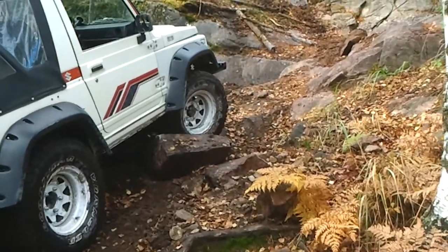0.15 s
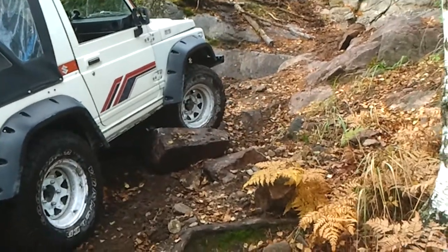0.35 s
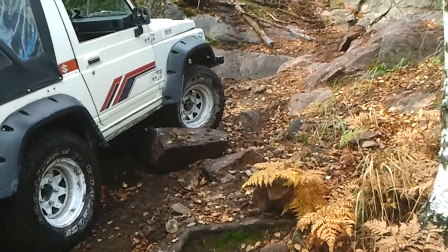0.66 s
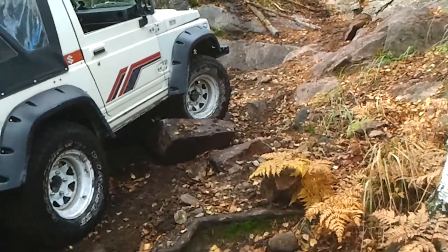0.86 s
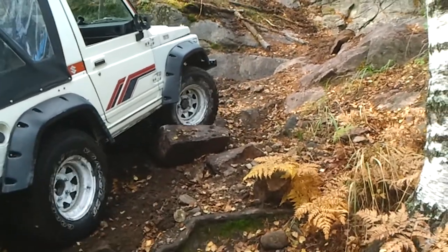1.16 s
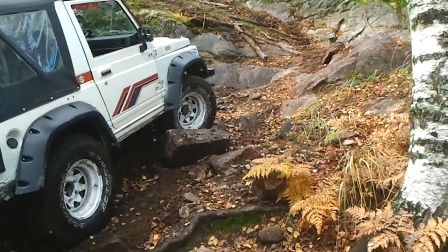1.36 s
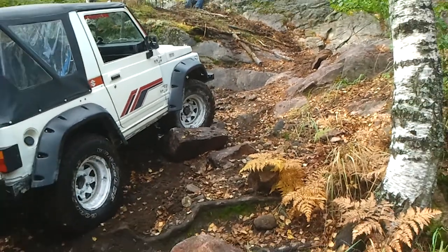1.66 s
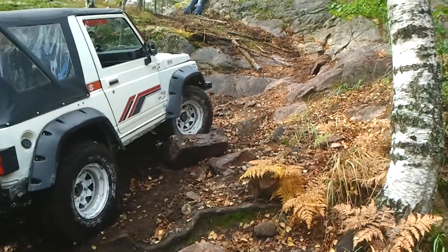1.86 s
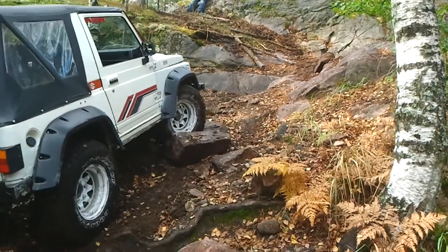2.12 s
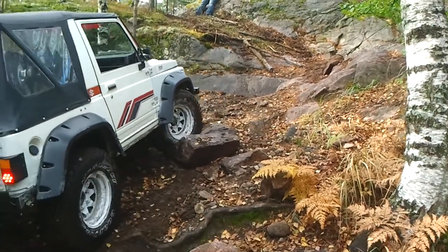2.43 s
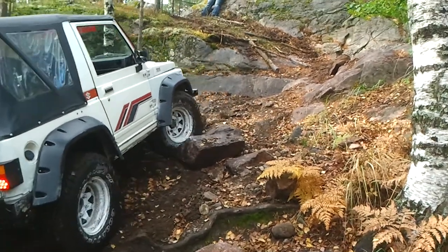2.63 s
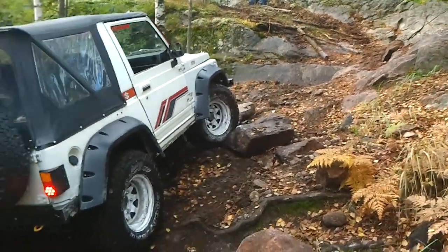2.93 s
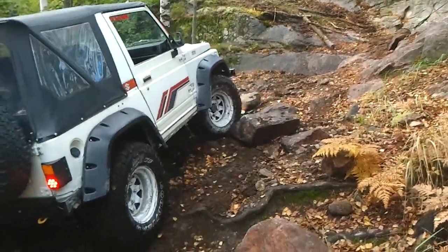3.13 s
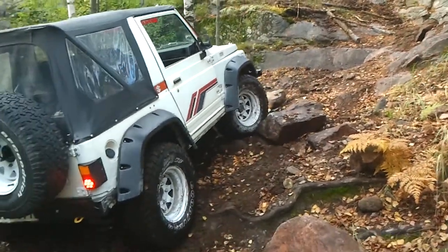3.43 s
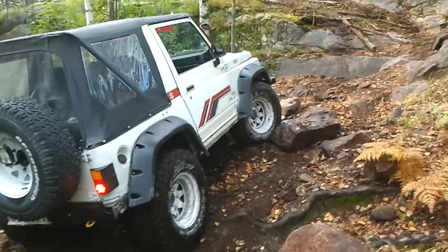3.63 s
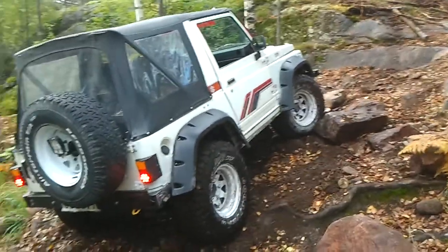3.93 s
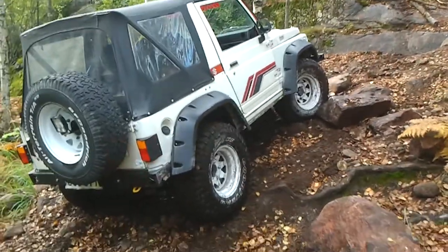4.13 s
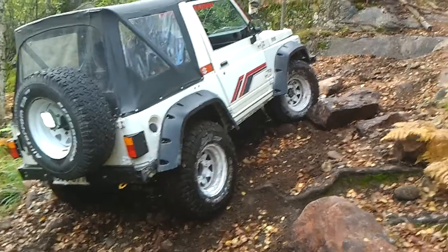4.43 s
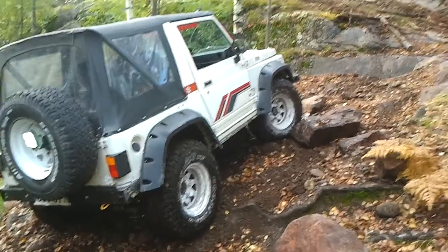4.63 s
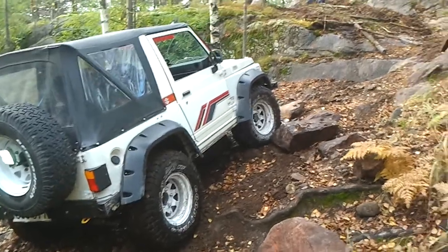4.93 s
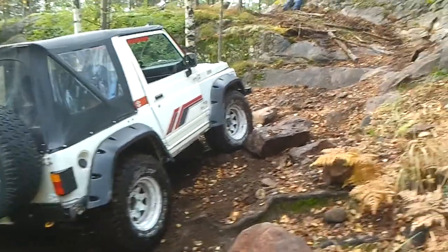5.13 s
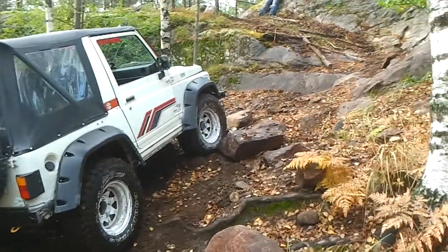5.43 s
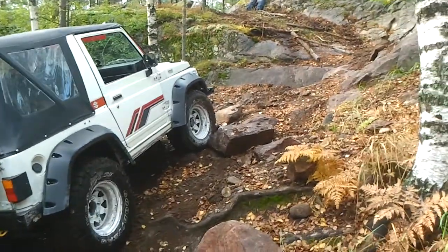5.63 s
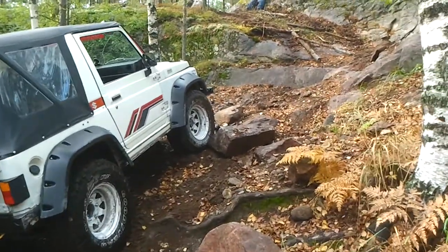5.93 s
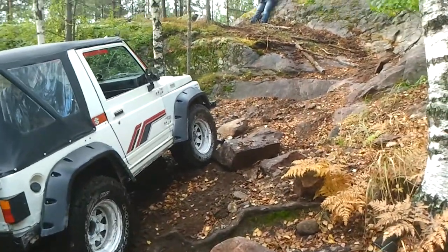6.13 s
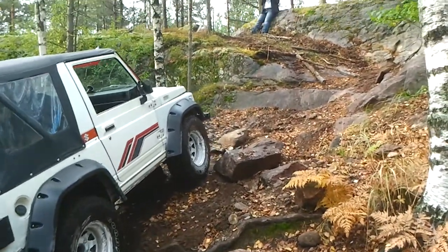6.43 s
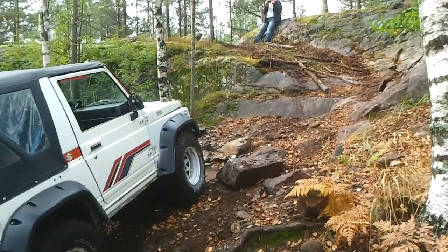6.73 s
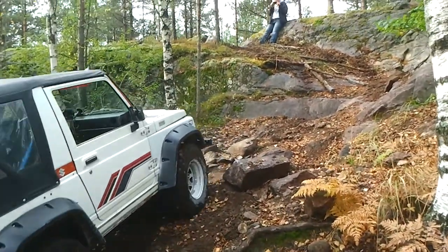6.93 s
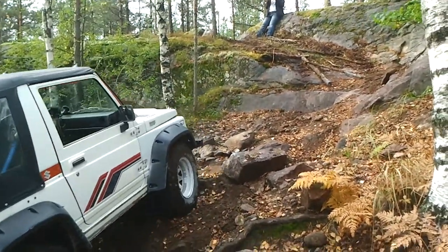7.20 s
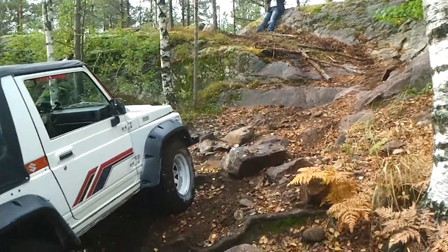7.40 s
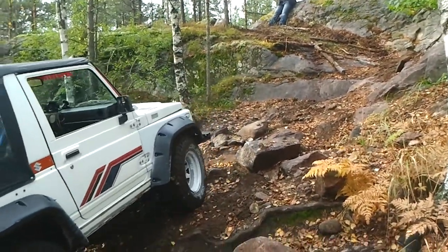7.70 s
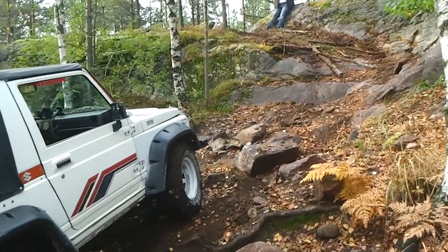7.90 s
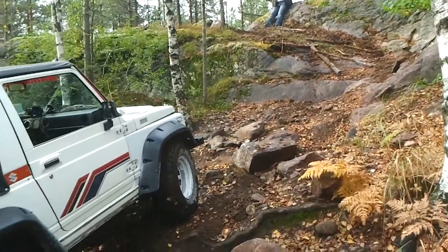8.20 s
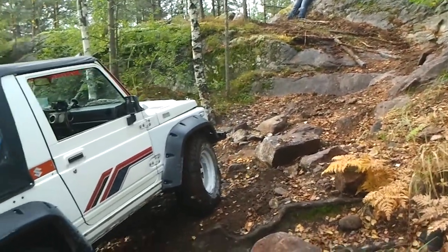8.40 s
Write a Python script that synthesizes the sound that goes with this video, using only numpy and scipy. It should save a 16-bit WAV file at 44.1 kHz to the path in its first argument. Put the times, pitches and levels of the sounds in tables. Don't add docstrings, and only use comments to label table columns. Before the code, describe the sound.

On a rocky woodland slope, a four-cylinder off-road car revs with barking exhaust, valve clatter and fan hiss. After two joined surges it falls to a rough idle, past a bright snap and a short high squeal. A cluster of hard stone knocks follows, then a short rev, a rock clunk and more knocks. A distant engine rises near the end; the microphone is close, with limited treble.

```python
import sys
import numpy as np
from scipy import signal
from scipy.fft import rfft, irfft
from scipy.io import wavfile
from scipy.ndimage import uniform_filter1d

SR = 44100
rng = np.random.default_rng(int(sys.argv[2]) if len(sys.argv) > 2 else 0)


def elevation(decibels):
    levels = np.asarray(decibels, float)
    return 10 ** (levels / 20)


def pcm_store(signal):
    levels = np.round(np.clip(np.atleast_2d(signal), -1, 1) * 32767)
    wavfile.write(sys.argv[1], SR, levels.astype(np.int16).T)


N = 377496


def evened(x):
    return x / np.sqrt(np.mean(x ** 2) + 1e-20)


def steadied(x):
    power = uniform_filter1d(uniform_filter1d(x ** 2, size=4000), size=4000)
    return x / np.sqrt(abs(power) + 1e-20)


def columns(rows):
    s, *values = np.transpose(rows)
    return [np.interp(np.arange(N) / SR, s, v) for v in values]


def add(mix, s, sound):
    part = mix[round(s * SR):][:len(sound)]
    part += sound[:len(part)]


def resonate(x, hz, width):
    turn = np.exp(2j * np.pi * hz * np.arange(len(x)) / SR)
    r = np.exp(-np.pi * abs(width) / SR)
    return 2 * (turn * signal.lfilter([1 - r], [1, -r], x / turn)).real


def body(x, modes):
    return sum((-1) ** k * elevation(db) * resonate(x, hz, width) for k, (hz, width, db) in enumerate(modes))


def noise(points, patchy_db):
    frames = N // 128 + 5
    a, b, patches = rng.standard_normal((frames, 257, 3)).T
    patches = uniform_filter1d(patches, size=6, axis=0)
    patches = evened(uniform_filter1d(patches, size=12, axis=1))
    spectra = (a + 1j * b) * elevation(patchy_db * patches)
    white = signal.istft(spectra, nperseg=512, noverlap=384)[1][:N]
    f, db = np.transpose(points)
    hz = np.fft.rfftfreq(N, 1 / SR)
    colour = elevation(np.interp(np.log(hz + 1), np.log(f + 1), db, left=-90, right=-90))
    return evened(irfft(rfft(white) * colour, N))


def spectrum_db(points, hz):
    f, db = np.transpose(points)
    return np.interp(np.log(hz), np.log(f), db)


def drift(per_s):
    t = np.arange(0, N + 200, 200) / SR
    f, phase = np.geomspace(per_s / 10, per_s, num=24), rng.random(24)
    swings = np.sin(2 * np.pi * (f * t[:, None] + phase)) / np.sqrt(f)
    return np.interp(np.arange(N) / SR, t, evened(swings.sum(axis=1)))


def forest_rumble():
    # frequency in Hz, level in dB per Hz.
    rumble_colour = [(21, -47), (35, -7), (185, -24.5), (232, 4), (294, -6.5), (391, -12.5), (508, -24),
                     (600, -20), (780, -35.5), (1320, -120)]
    return elevation(-46.5) * noise(rumble_colour, patchy_db=0.5)


def far_engine():
    # time in seconds, firings per second, first order in dB, second order in dB.
    far_rev = [(7.38, 51.9, -53, -57), (7.402, 55.0, -52, -48), (7.486, 59.0, -47, -38),
               (7.698, 92.0, -46, -49), (7.806, 100.2, -40, -49), (7.954, 104.5, -42, -44),
               (8.21, 102.8, -53, -50), (8.45, 59.6, -53, -57)]
    hz, first_db, second_db = columns(far_rev)
    t, phase = np.arange(N) / SR, 2 * np.pi * np.cumsum(hz) / SR
    on = np.clip(np.minimum(t - far_rev[0][0], far_rev[-1][0] - t) / .05, 0, 1)
    return np.sqrt(2) * on * (elevation(first_db) * np.sin(phase) + elevation(second_db) * np.sin(2 * phase))


def slope(x):
    at = np.arange(200, 8000, 20)
    taps = np.zeros(8020)
    late = rng.integers(0, 20, len(at))
    taps[at + late] = rng.choice([-1., 1.], len(at)) * elevation(-60 * at / SR / 0.15)
    return signal.oaconvolve(x, taps / np.linalg.norm(taps))[:N]


def crack(peak_db):
    t = np.arange(-20, 60) / SR
    click = -t / .00005 * np.exp(-(t / .00007) ** 2)
    rebounds = np.r_[1, np.zeros(13), -.6, np.zeros(17), .35]
    return elevation(peak_db) * np.convolve(click, rebounds)


def scrape(length, db, hz, width):
    # frequency in Hz, width in Hz, level in dB.
    chassis = [(900, 280, -11), (1685, 120, -6), (2160, 54, -6), (2560, 190, -7), (3650, 590, -26),
               (5290, 69, -8), (5660, 1100, -9)]
    n = int(length * SR)
    slips = rng.standard_normal(6000) * (rng.random(6000) < 6000 / SR)
    shaped = resonate(body(slips, chassis) + .06 * slips, hz, width)
    return elevation(db) * evened(shaped[:n]) * signal.windows.tukey(n, .3) * np.linspace(1.2, .7, n)


def squeak(length, db, start_hz, end_hz):
    n = int(length * SR)
    flutter = 1 + .16 * evened(uniform_filter1d(rng.standard_normal(6000), size=70))[:n]
    tone = np.sin(2 * np.pi * np.cumsum(np.linspace(start_hz, end_hz, n)) / SR)
    swell = signal.windows.tukey(n, .3) if db < -18 else np.hanning(n) ** 2
    return elevation(db) * np.sqrt(2) * flutter * tone * swell


def knock(peak_db, hz, thump_db, snap_db):
    t = np.arange(2000) / SR
    a, b = rng.standard_normal((2, 2000))
    contact_s = .0022 - .00004 * (snap_db + 48)
    push = t / contact_s * np.exp(1 - t / contact_s)
    rattle = evened(resonate(resonate(a, 1300, 2700), 1200, 2700))
    ring = 1.26 * np.sin(2 * np.pi * hz * t) + 0.73 * rattle
    snap = evened(resonate(resonate(b, 4600, 3700), 4600, 3700))
    thump = np.sin(2 * np.pi * 285 * t) * t / 0.0036 * np.exp(1 - t / 0.0015)
    return elevation(peak_db - 4.5) * ring * push + elevation(snap_db) * snap * push ** 2 + elevation(thump_db + 17.5) * thump


def clunk(db, grind, low_hz, high_hz):
    t, rub = np.arange(5000) / SR, rng.standard_normal(5000)
    contact = np.minimum(t / .002, 1) * elevation(-60 * np.maximum(t - grind, 0) / .09)
    panels = resonate(rub, low_hz, 460) - resonate(rub, high_hz, 510) + 0.45 * resonate(rub, 354, 150)
    panels = evened(resonate(panels, 1500, 1800))
    treble = evened(resonate(resonate(rub, 4200, 3500), 4200, 3500)) * elevation(-60 * t / .12)
    return elevation(db) * (panels + elevation(-6.5) * treble) * contact


def ground_contacts():
    # start in seconds, peak in dB, ring in Hz, thump in dB, snap in dB.
    stones = [(0.609, -22.5, 730, -22.5, -38), (3.93, -18, 725, -17.5, -35), (4.62, -29, 1229, -53, -34),
              (4.954, -12, 679.5, -21, -27.5), (4.998, -21.5, 828, -32, -32.5), (5.013, -23, 823, -31, -34),
              (5.044, -27, 813, -33.5, -29.5), (5.061, -21.5, 840, -47, -35),
              (5.179, -31.5, 1775, -40, -44), (5.265, -25, 846, -58, -48), (5.668, -33, 1426, -37.5, -40),
              (5.8, -23, 998, -33.5, -49.5), (5.884, -21, 803.6, -35, -31), (5.916, -16, 842, -22.5, -26),
              (5.962, -21, 915, -21.5, -59), (6.804, -18, 1840, -45, -38), (6.919, -17, 1064, -24.5, -29)]
    # start in seconds, level in dB, grinding time in seconds,
    # lower ring in Hz, upper ring in Hz.
    rocks = [
        (2.356, -16.5, 0.019, 1185, 2110),
        (6.578, -16.5, 0.02, 1100, 2190),
        (7.398, -16.5, 0.023, 1620, 1990),
    ]
    # start in seconds, peak in dB.
    twigs = [
        (3.3692, 4),
        (6.8185, -7.5),
    ]
    # start in seconds, length in seconds, level in dB, centre in Hz, width in Hz.
    creaks = [(0.0, .11, -30.5, 2600, 4000), (.19, 0.039, -37, 5540, 1520),
              (3.122, 0.017, -24.5, 3600, 4000), (3.142, 0.04, -23, 2600, 2950),
              (3.172, 0.043, -21.5, 2520, 3000), (3.328, 0.034, -22.5, 2720, 2480),
              (3.52, 0.097, -32.5, 4200, 3500), (4.4, 0.051, -39, 1262, 1190),
              (4.435, 0.025, -43, 3480, 3000), (5.07, .08, -40.5, 5780, 1800),
              (6.93, 0.054, -42, 2900, 4000), (7.11, 0.033, -37, 5450, 2000),
              (7.15, 0.0083, -31.5, 4300, 1190), (6.92, 0.045, -26.5, 220.9, 152),
              (7.05, .07, -31.5, 236, 149), (7.32, 0.084, -39, 5110, 2480),
              (7.68, 0.051, -41.5, 2496, 3040), (7.945, 0.017, -41, 3800, 1210),
              (1.035, 0.046, -23, 1520, 1810), (.715, 0.089, -27, 550, 400), (5.98, .13, -28.5, 550, 600),
              (4.615, .03, -38, 3457, 4015)]
    contacts = np.zeros(N)
    for table, source in ((stones, knock), (rocks, clunk), (twigs, crack), (creaks, scrape)):
        for s, *row in table:
            add(contacts, s, source(*row))
    return signal.sosfilt(signal.butter(N=2, Wn=140, btype="high", fs=SR, output="sos"), contacts)


def brake_squeaks():
    # start in seconds, length in seconds, level in dB, Hz at start, Hz at end.
    squeals = [(3.235, .075, -15, 5410, 5360), (3.272, .035, -16, 5315, 5300),
               (3.297, .035, -28, 5330, 5310), (3.15, .06, -34, 985, 985), (3.212, .035, -32, 982, 982),
               (3.34, .06, -26, 981, 979), (7.842, .07, -29, 3232, 3226), (7.912, .03, -44, 3228, 3228),
               (0.02, .09, -42, 3945, 3945)]
    brakes = np.zeros(N)
    for s, *row in squeals:
        add(brakes, s, squeak(*row))
    return brakes


def jolts():
    # time in seconds, drop of the clean orders in dB, thud in dB.
    snatches = [(1.585, -10, -47), (1.86, -1, -45), (2.31, -3, -43), (0.806, -1.5, -59)]
    jolt_s, thud_hz = 0.027, 63
    t = np.arange(N) / SR
    drop_db, thuds = np.zeros((2, N))
    for s, db, thud_db in snatches:
        drop_db += db * np.exp(-((t - s) / jolt_s) ** 2)
        swell = np.exp(-((t - s - jolt_s) / jolt_s) ** 2)
        thuds += elevation(thud_db) * 2 * swell * np.sin(2 * np.pi * thud_hz * (t - s))
    return drop_db, thuds


def firings(turns, uneven):
    # a cylinder's strength in dB, its lateness as a share of a firing gap.
    cylinders = [(3.5, 0.02), (-3.5, 0.05), (1.5, -0.03), (-2.0, -0.03)]
    count = np.arange(1, int(turns[-1]))
    db, late = np.transpose(cylinders)[:, count % 4]
    chance = rng.standard_normal((2000, 2))[:len(count)]
    rough = np.interp(count, turns, uneven)
    size = elevation(rough * (db + 1.2 * chance[:, 0]))
    moment = count + rough * (late + .012 * chance[:, 1])
    even, real = np.zeros((2, N))
    even[np.interp(count, turns, np.arange(N)).astype(int)] = 1
    real[np.interp(moment, turns, np.arange(N)).astype(int)] = size
    return real, real - even


def low_orders(hz, turns, throttle, fade_db):
    # frequency in Hz, level in dB.
    shut = [(40, -46.5), (62, -25.5), (100, -33), (125, -30), (146, -19.5), (195, -44), (255, -30),
            (380, -38.5)]
    wide_open = [(42, -37), (65, -31.5), (95, -36), (155, -18), (208, -21), (260, -12), (315, -20.5),
                 (390, -23.5)]
    waver_db = 2.5
    low = np.zeros(N)
    for k in range(1, 7):
        db = (1 - throttle) * spectrum_db(shut, k * hz) + throttle * spectrum_db(wide_open, k * hz)
        db = db + fade_db + waver_db * min(k, 4) / 3 * drift(14)
        db = db - 9 * max(k - 4, 0)
        db = db - 59 * np.maximum(np.log2(k * hz / 403), 0)
        low += np.sqrt(2) * elevation(db) * np.cos(2 * np.pi * k * turns + k * k)
    cam = .42 * np.clip(5 * (1 - throttle), .3, 1) * np.cos(np.pi * turns / 2)
    low = low + cam * resonate(low, 275, 130)
    half_db = 1.26 * fade_db - 22.5 - 6 * throttle + waver_db * drift(12)
    for odd in range(3, 8, 2):
        near = 1 / (1 + ((odd * hz / 2 - 147) / 13.6) ** 4)
        low = low + np.sqrt(2) * elevation(half_db) * near * np.cos(odd * np.pi * turns + odd)
    return low


def exhaust_pipe(upper, lumps, gas, uneven):
    # pipe ring in Hz, width in Hz, level in dB.
    pipe_rings = [(146, 22, 8), (262, 45, 0), (340, 60, -13), (225, 35, -6)]
    high_pass = signal.butter(N=3, Wn=118, btype="high", fs=SR, output="sos")
    pipe = signal.sosfilt(high_pass, body(upper + lumps + .07 * uneven ** 2 * gas, pipe_rings))
    pipe = resonate(pipe, 200, 330)
    pipe = pipe - .7 * resonate(pipe, 192, 45)
    return steadied(pipe)


def silencer_bark(upper, lumps, gas, uneven):
    # silencer ring in Hz, width in Hz, level in dB.
    silencer_rings = [(400, 104, 7), (622, 124, 1.5), (694, 115, 0), (956, 63, -8)]
    push = (1.1 - uneven) * upper + .6 * lumps + (.02 + .13 * uneven) * gas
    return steadied(resonate(body(push, silencer_rings), 700, 700))


def valve_clatter(beat, gas, throb):
    # frequency in Hz, level in dB per Hz.
    clatter_colour = [(440, -19), (750, -8.5), (905, -11.5), (1070, -10), (1680, -7.5), (1990, -12),
                      (2140, -17), (3200, -26), (4160, -37.5), (7040, -120)]
    clatter = beat * noise(clatter_colour, patchy_db=1.6)
    hum = resonate(resonate(gas, 847, 45), 847, 45) / steadied(throb).clip(1)
    return steadied(clatter + 0.3 * evened(hum))


def fan_hiss(beat):
    # frequency in Hz, level in dB per Hz.
    hiss_colour = [(1290, -31), (2200, -11), (2960, -14.5), (3230, -15), (3780, -11), (4510, -13),
                   (6280, -11), (7140, -15.5), (7610, -15), (8120, -18), (8860, -35), (11500, -80.5),
                   (19500, -120)]
    return steadied(beat * noise(hiss_colour, patchy_db=1.5))


def engine():
    # time in seconds, firings per second.
    crank_speed = [(0, 51), (.47, 43), (.78, 71.6), (.97, 84), (1.22, 89.3), (1.4, 95), (1.53, 95.4),
                   (1.73, 93.3), (1.86, 83.5), (2.0, 79.3), (2.27, 89.7), (2.38, 90.5), (2.81, 68),
                   (3.67, 45.9), (4.33, 28.7), (5.82, 26.5), (6.1, 63.5), (6.48, 31.5)]
    # time in seconds, throttle from 0 to 1.
    pedal = [(.44, 0.01), (.74, 0.83), (.82, 0.72), (1.22, 1), (1.33, 0.99), (1.48, 0.72), (1.59, 0.32),
             (1.66, 0.37), (1.86, 0.13), (1.95, 0.8), (2.27, 0.97), (2.31, 0.16), (2.74, 0.14), (3.2, 0.02),
             (5.83, 0), (5.95, .9), (6.06, 0.77), (6.14, 0.02)]
    # time in seconds, tailpipe nearer in dB, bonnet nearer in dB.
    stance = [(0, -6, 1.5), (.3, -4, -2.5), (.75, 0, 2.5), (1.55, -5.5, 2), (2.1, -1.5, 5), (2.45, -7, 2),
              (2.8, -2, 1.5), (3.4, -2, 3.5), (4.15, 2.5, -2.5), (4.7, -5.5, 0.5), (5.82, -7, 0.5),
              (5.92, 6, 1), (6.4, 3, 1), (6.8, -1, 10), (6.97, 8.5, 11.5), (7.25, -2, 9.5), (7.7, -2, 6),
              (8.56, -9.5, 3)]
    (hz,), (throttle,), (tail_db, bonnet_db) = columns(crank_speed), columns(pedal), columns(stance)
    throttle = np.clip(throttle, 0, 1)
    turns = np.cumsum(hz) / SR

    octaves = np.log2(hz / 60)
    pipe_db = -29.5 + 8.9 * octaves + 1 * throttle
    bark_db = -44.5 + 18.7 * octaves + 13.82 * throttle
    clatter_db = -38.5 + 6.5 * octaves + 6.1 * throttle
    hiss_db = -37 + 7.73 * octaves + 2.8 * throttle
    bark_db = bark_db + 10 * np.exp(-((np.arange(N) / SR - 2.914) / 0.61) ** 2)

    drop_db, thuds = jolts()
    fade_db = 21.5 * np.minimum(np.log2(hz / 67), 0) * (1 - .6 * throttle)
    fade_db = fade_db + drop_db + 0.25 * tail_db

    uneven = .9 + (.3 - .9) * np.minimum(throttle / .75, 1)
    pulses, lumps = firings(turns, uneven)
    throb = signal.lfilter([1], [1, -np.exp(-1 / (.003 * SR))], pulses)
    gas = (.4 * throb + .25 * uneven) * rng.standard_normal(N)
    beat = 1 + .004 * hz * np.cos(2 * np.pi * turns) + .1 * steadied(throb)
    upper = sum(np.cos(2 * np.pi * k * turns + .2 * k * k) for k in range(5, 30)) * 2 * hz / SR

    exhaust = low_orders(hz, turns, throttle, fade_db) + thuds
    exhaust = exhaust + elevation(pipe_db + tail_db) * exhaust_pipe(upper, lumps, gas, uneven)
    idle_bark = elevation(-56.5 + 0.34 * tail_db) * (30 / hz) ** 3
    bark_gain = elevation(bark_db + 1.62 * tail_db) + idle_bark
    exhaust = exhaust + bark_gain * silencer_bark(upper, lumps, gas, uneven)
    bonnet = elevation(clatter_db + bonnet_db) * valve_clatter(beat, gas, throb)
    bonnet = bonnet + elevation(hiss_db + 0.47 * bonnet_db) * fan_hiss(beat)
    return exhaust + bonnet


def scene():
    background = forest_rumble() + far_engine()
    contacts, brakes = ground_contacts(), brake_squeaks()
    echoes = elevation(-13) * slope(contacts + .4 * brakes)
    return (background + echoes + contacts + brakes + engine())[None]


def top_cut(x):
    return signal.sosfilt(signal.butter(12, 9010, fs=SR, output="sos"), x)


def record(dry):
    f = [0, 6600, 7500, 7950, 8100, 8800, 9100, SR / 2]
    gain = elevation(np.array([0.0, -3.5, -15.0, -38, -23.5, -22.5, -74, -100]))
    taps = signal.firwin2(801, f, gain, fs=SR)
    mix = signal.oaconvolve(dry, taps[None], "same")
    return top_cut(mix)


dry = scene()
out = record(dry)
pcm_store(out)
```